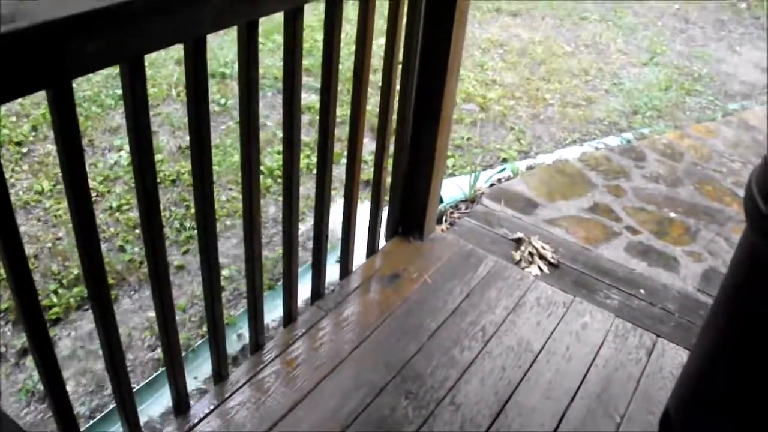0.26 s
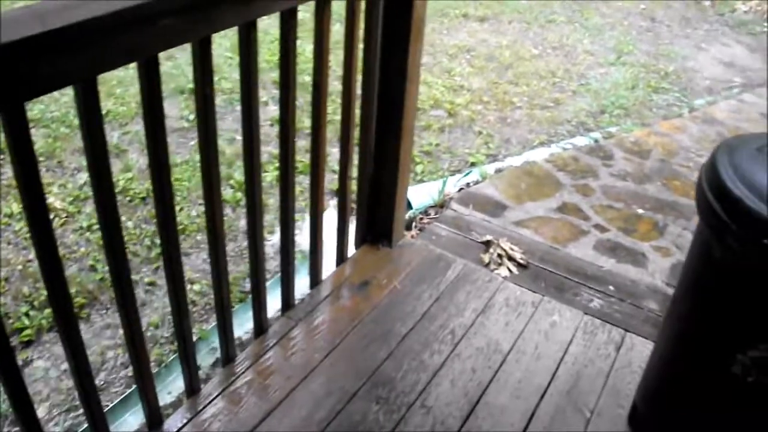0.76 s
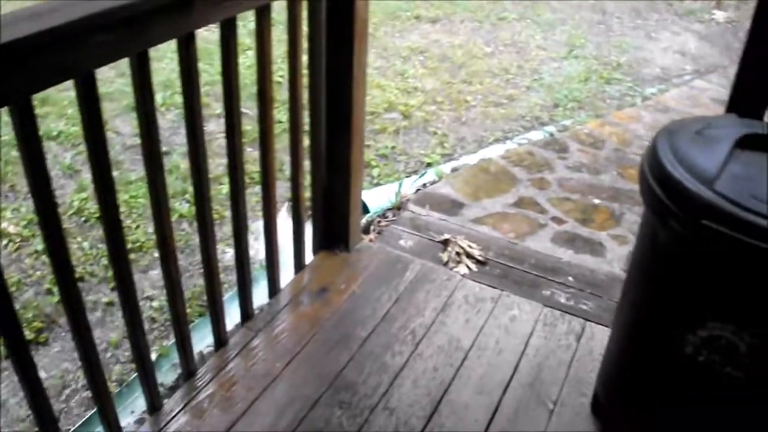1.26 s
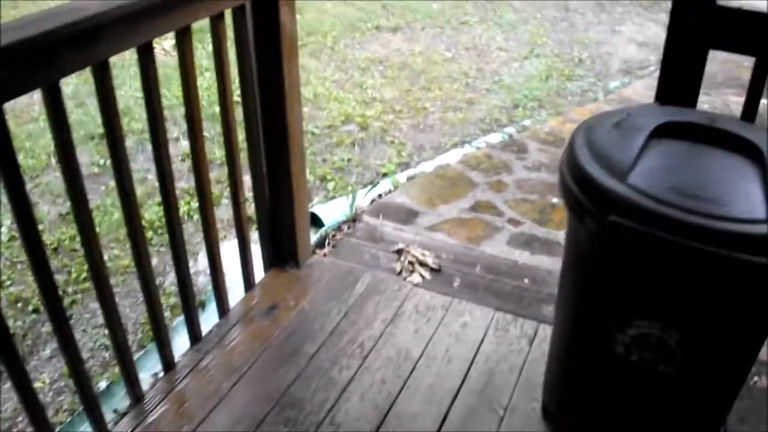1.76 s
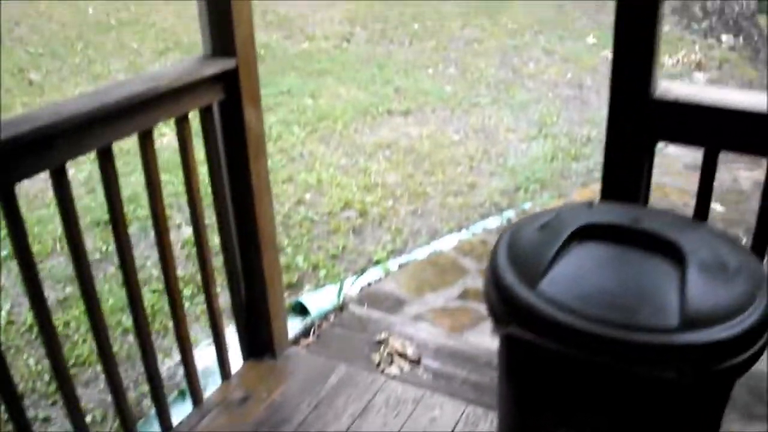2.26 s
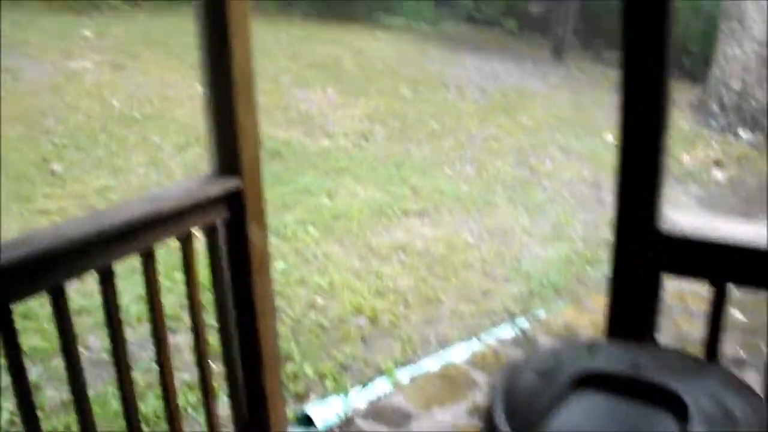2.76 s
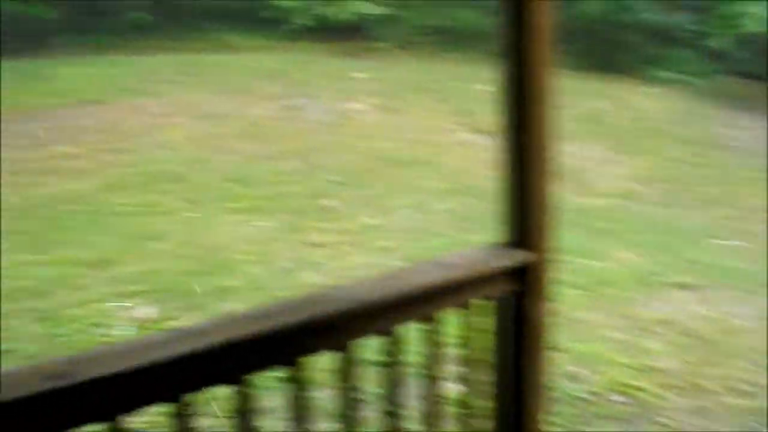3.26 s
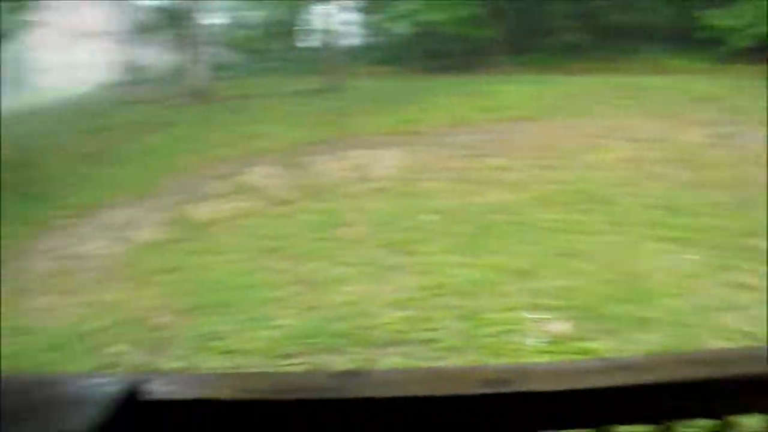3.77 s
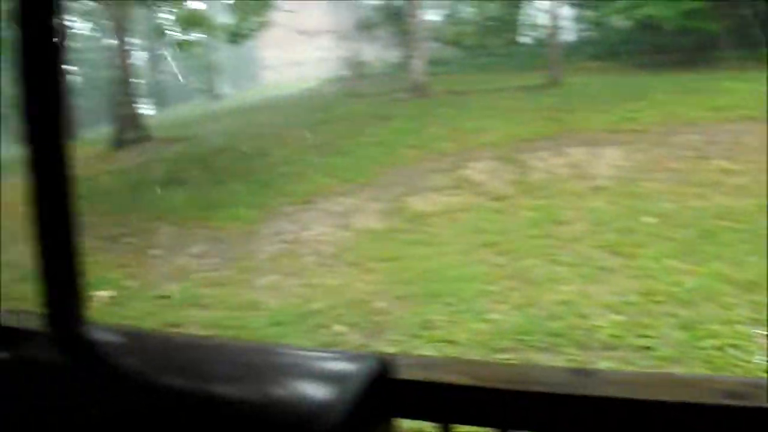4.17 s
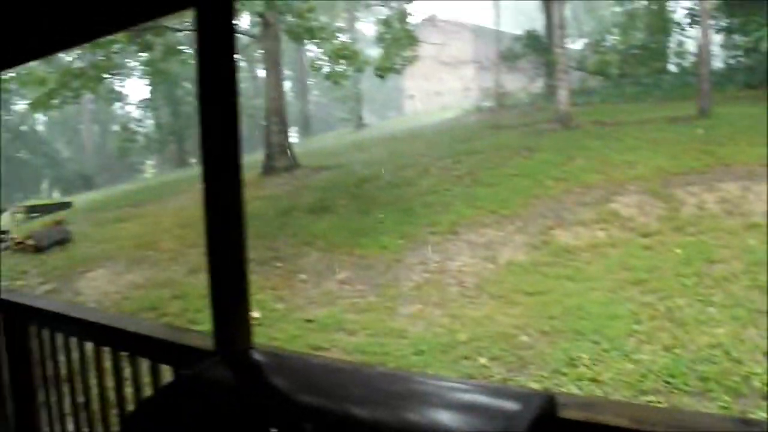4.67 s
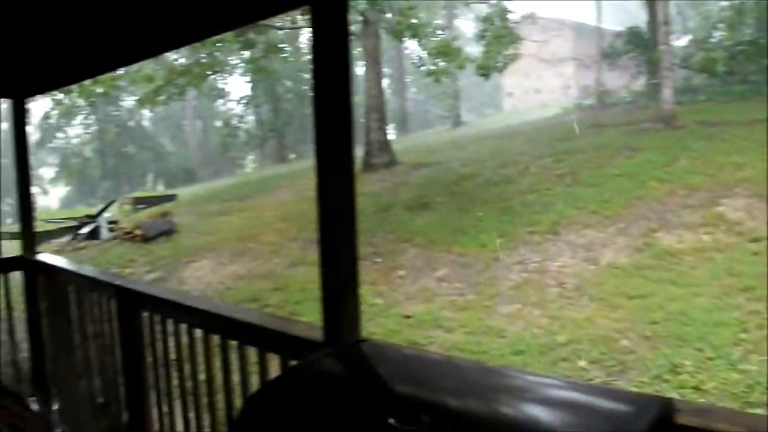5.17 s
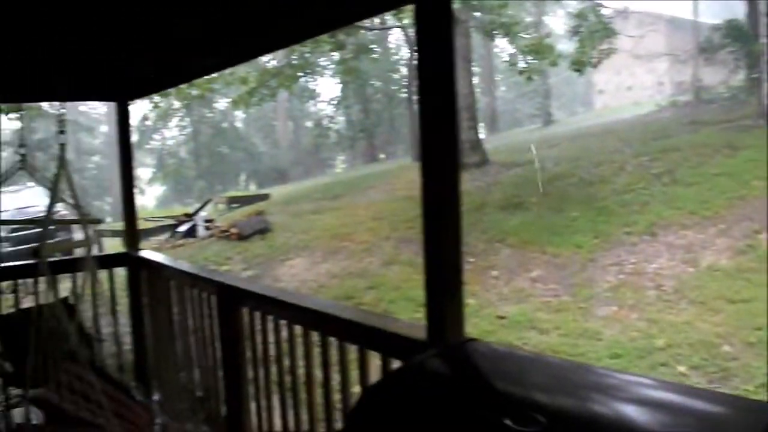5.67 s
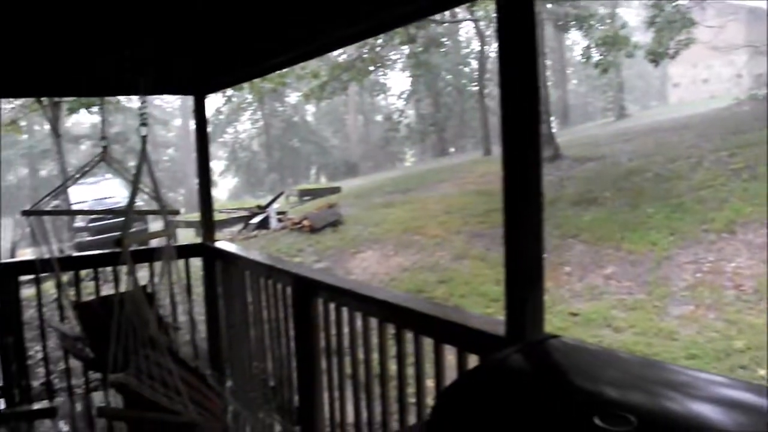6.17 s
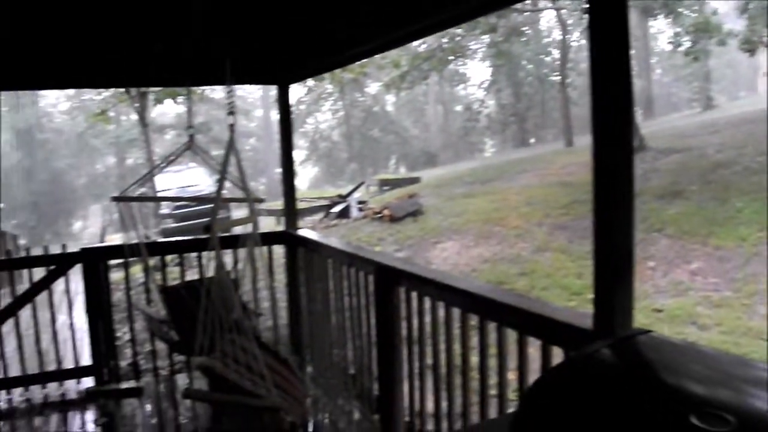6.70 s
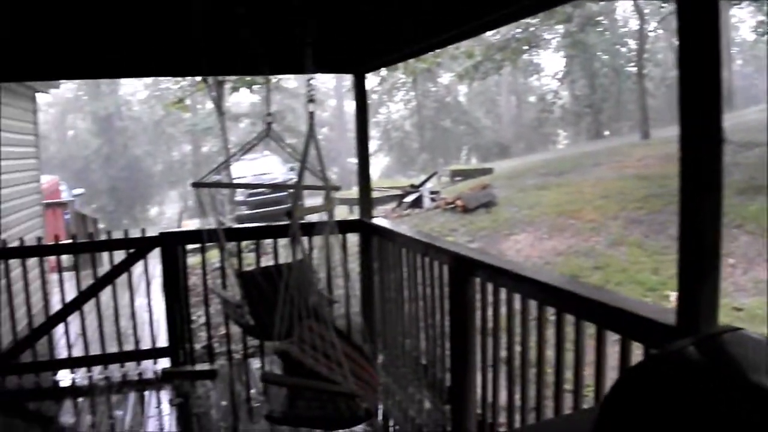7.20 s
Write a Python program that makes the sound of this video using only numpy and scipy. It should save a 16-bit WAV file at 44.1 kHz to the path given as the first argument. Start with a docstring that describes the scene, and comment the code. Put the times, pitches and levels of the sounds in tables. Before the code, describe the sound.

Heavy rain hisses shrilly and steadily around a wooden porch, with close drops splashing and ticking and brief low wind rumbles buffeting the microphone.

```python
"""A shrill, pumping hiss: heavy rain on a lawn and trees, heard from a roofed wooden porch.
Countless far drops merge into a noise wash, and nearer drops are random clicks that patter.
Close splashes are clicks with a puff of noise, sharp ticks are bare clicks, and wind is a low rumble.
The microphone's port rings near 3 kHz, which makes the rain shrill.
Loud splashes make a limiter turn everything down briefly, so the hiss pumps."""
import sys
import numpy as np
from scipy import signal
from scipy.fft import rfft, irfft, next_fast_len
from scipy.io import wavfile
from scipy.ndimage import uniform_filter1d, minimum_filter1d

SR = 44100
rng = np.random.default_rng(int(sys.argv[2]) if len(sys.argv) > 2 else 0)


def inscribe(sig):
    """Save sig as 16-bit PCM at rate SR to the path in sys.argv[1].

    A 1-D sig is mono; a 2-D sig holds one channel per row.
    Samples are clipped to [-1, 1] before scaling.
    """
    pcm = np.round(np.clip(np.atleast_2d(sig).T, -1, 1) * 32767)
    wavfile.write(sys.argv[1], SR, pcm.astype(np.int16))


N = 328104  # length in samples, about 7.4 s


def from_db(db):
    """Turn decibels into a plain multiplier."""
    return 10 ** (np.asarray(db) / 20)


def rms_one(x):
    """Scale a sound to an average power of one."""
    return x / np.sqrt(np.mean(x ** 2) + 1e-20)


def level_over_time(points):
    """Join (time, level) points with straight lines."""
    times, levels = np.transpose(points)
    return np.interp(np.arange(N) / SR, times, levels)


def at_hz(points, hz):
    """Read a curve at any frequency, with pitch spaced as the ear hears it (log scale)."""
    point_hz, values = np.transpose(points)
    return np.interp(np.log(hz), np.log(point_hz), values)


def butter(x, hz, kind, order=2):
    """Keep the lows, the highs or a band, with a smooth Butterworth filter."""
    safe_hz = np.clip(hz, 10, .45 * SR)
    sections = signal.butter(order, safe_hz, kind, fs=SR, output="sos")
    return signal.sosfilt(sections, x + 1e-18)


def drift(rate_hz):
    """Wander slowly at random around zero, with a typical size of one."""
    step = 40  # compute one point every 40 samples, then join the points
    r = np.exp(-2 * np.pi * rate_hz * step / SR)
    noise = rng.standard_normal(N // step + 2002)
    slow = signal.lfilter([1], [1, -2 * r, r * r], noise)[2000:]  # skip the filter's start-up
    return np.interp(np.arange(N) / step, np.arange(len(slow)), rms_one(slow))


def clicks(rows):
    """Place a one-sample click of the given level at each given time."""
    times, levels_db = np.transpose(rows)
    out = np.zeros(N)
    out[np.round(times * SR).astype(int)] = from_db(levels_db)
    return out


def swells(rows, attack_s, release_s):
    """Ramp each swell up and down; short ones stay below full height, overlapping ones add in dB."""
    t = np.arange(N) / SR
    total_db = 0
    for start, length, db in rows:
        rise = (t - start) / attack_s
        fall = (start + length - t) / release_s
        total_db = total_db + db * np.clip(.5 + np.minimum(rise, fall), 0, 1)
    return total_db


# Light air on the microphone, strongest midway: (time [s], level [dB])
BREEZE_LEVEL = [(0, -45), (2.6, -43.5), (3.4, -36.5), (4.2, -39), (5.5, -40.5), (7.44, -38.5)]
# Gusts that buffet the microphone, timed between the half-way points of rise and fall:
# (time [s], length [s], full swell [dB])
WIND_GUSTS = [(2.83, 0.086, 7), (3.23, 0.045, 9), (3.34, 0.083, 4), (3.83, 0.16, 13.5), (4.02, 0.11, 13),
              (4.27, 0.053, 8), (4.46, 0.19, 10), (4.72, 0.28, 6.5), (6.22, 0.071, 17.5), (7.38, .1, 19)]


def wind(top_hz, even_s):
    """Air eddies press on both channels alike as a low rumble; breeze and gusts set its strength."""
    level_db = level_over_time(BREEZE_LEVEL) + swells(WIND_GUSTS, attack_s=0.11, release_s=0.05)
    eddies = butter(rng.standard_normal(N), top_hz, "low", order=3)
    eddies = butter(eddies, 15, "low", order=1)  # slower eddies push harder
    eddies = butter(eddies, 14, "high")
    # Even out the rumble's own ups and downs, so the level curve decides.
    power = uniform_filter1d(eddies ** 2, int(even_s * SR) + 1)
    return from_db(level_db) * eddies / np.sqrt(power + 1e-12)


# Sharp bright ticks, levels before filter and mix: (time [s], level [dB])
SHARP_TICKS = [(.205, -6), (.858, -4), (1.792, 2), (5.6392, 6), (7.187, 1)]


def ticks():
    """Each tick is a short, hard click with only its highs kept."""
    return butter(clicks(SHARP_TICKS), 2600, "high")


# Big drops splashing close by, levels before filters and mix: (time [s], level [dB])
CLOSE_SPLASHES = [(0.452, 1.2), (0.617, 2.7), (0.76, 2.5), (0.953, 3), (1.042, 3), (1.185, 1.4),
                  (1.313, 2.5), (1.439, 1.5), (1.814, 0.5), (1.96, 0.8), (2.045, 1.5), (2.315, 1.5),
                  (2.407, 1), (2.495, 1.9), (2.583, 2.6), (2.653, 8), (2.925, 3), (3.003, 2.5), (3.187, 3),
                  (3.288, -4), (3.61, 2.5), (3.793, 1.4), (3.931, -6), (4.112, 3.5), (4.191, 3),
                  (4.338, 3.8), (4.407, 1.2), (4.57, 4.5), (4.733, 2.5), (4.885, 2), (5.198, 4.5),
                  (5.316, 1.2), (5.388, 0.4), (5.569, 5), (5.64, 3.5), (5.715, 4.5), (5.788, 5),
                  (5.941, 1.5), (6.027, -2), (6.082, 2), (6.168, 3.5), (6.252, 4), (6.665, 4.5),
                  (6.825, 2.8), (7.256, 5.5), (7.362, 1.9)]


def splashes(spray_s, spray_db, top_hz):
    """A big drop slaps the porch edge with a click and throws a brief, fading spray of noise."""
    t = np.arange(SR // 40) / SR
    hits = clicks(CLOSE_SPLASHES)
    spray_strength = signal.fftconvolve(hits, np.exp(-t / spray_s))[:N]
    spray = spray_strength * rng.standard_normal(N)
    bright = butter(hits + from_db(spray_db) * spray, 2010, "high")
    return butter(bright, top_hz, "low", order=3)


def patter(per_s, size_spread_db, low_hz, top_hz):
    """Nearer drops tick at random from left, front and right, many small and a few large."""
    out = np.zeros((2, N))
    for lag in (-1, 0, 0, 1):  # samples by which the left channel hears the drop later
        sizes = from_db(size_spread_db * np.minimum(rng.exponential(1, N), 4))
        sizes = sizes * rng.choice([-1, 1], N)  # push or pull
        drops = sizes * (rng.random(N) < per_s / 4 / SR)
        out += [np.roll(drops, lag), drops]
    bright = butter(out, low_hz, "high", order=1)
    return rms_one(butter(bright, top_hz, "low", order=6))


# Tone colour of rain in the open air: (frequency [Hz], relative level [dB per Hz])
RAIN_COLOUR = [(40, -10), (80, -2.5), (140, -3), (250, -3), (400, -4.5), (700, -2), (1200, -4), (2000, -3),
               (3200, 0), (4600, 3), (5700, 0), (7200, 4.5), (10300, -2.5), (12000, -25), (15000, -3)]
# Likeness of the two channels in the wash: (frequency [Hz], correlation [1 = same])
CHANNEL_LIKENESS = [(300, 1), (700, 1), (1400, 1), (3100, 1), (5000, 0.97), (7000, 1), (10000, 0.88),
                    (13000, .3)]
# Low wash of the lawn, a little fuller once the microphone faces it: (time [s], level [dB])
LAWN_LEVEL = [(0, -20), (2.9, -20), (4, -19.5), (7.44, -19.5)]


def wash(splash_db, spray_db, patchy_db, splash_hz, spray_hz):
    """Far drops merge into noise: soft ground gives the lows, puddles the middle, fine spray the top."""
    lawn_db = level_over_time(LAWN_LEVEL)
    edges = np.geomspace(40, 16000, 23)
    white = rng.standard_normal((2, 2, N))
    out = 0
    for k, (low, high) in enumerate(zip(edges, edges[1:])):
        mid, side = butter(white[k % 2], [low, high], "band")  # neighbouring bands use other noise
        hz = np.sqrt(low * high)
        # Blend from lawn to puddles to spray as the frequency rises.
        above_splash = 1 / (1 + (splash_hz / hz) ** 8)
        above_spray = 1 / (1 + (spray_hz / hz) ** 8)
        layer_db = (1 - above_splash) * lawn_db
        layer_db = layer_db + (above_splash - above_spray) * splash_db + above_spray * spray_db
        gain = from_db(at_hz(RAIN_COLOUR, hz) + layer_db + patchy_db * drift(26.6))
        # The shared part goes to both channels, the other part with opposite signs.
        alike = np.clip(at_hz(CHANNEL_LIKENESS, hz), -1, 1)
        stereo = np.sqrt(1 + alike) * mid + np.sqrt(1 - alike) * side * [[1], [-1]]
        out = out + gain * stereo
    return out


def scene():
    """Steady rain flutters slightly; close splashes, sharp ticks and wind lie on top."""
    flutter = from_db(0.21 * drift(13) + 0.56 * drift(30))
    puddles_db = -22 + 0.23 * drift(30)
    far = wash(puddles_db, spray_db=-22, patchy_db=1.38, splash_hz=2400, spray_hz=4200)
    near = from_db(-23) * patter(per_s=2000, size_spread_db=1.5, low_hz=1790, top_hz=10930)
    close = from_db(8.5) * splashes(spray_s=0.002, spray_db=-27, top_hz=5080)
    sharp = from_db(7.5) * ticks()
    return flutter * (far + near) + close + sharp + wind(top_hz=68, even_s=0.114)


def port_resonance(x, ring_hz, width_hz):
    """The air in the microphone port rings at its own pitch and boosts sound near it."""
    r = np.exp(-np.pi * width_hz / SR)
    w = 2 * np.pi * ring_hz / SR
    poles = [1, -2 * r * np.cos(w), r * r]
    return signal.lfilter([sum(poles)], poles, x)


def limiter(x, limit_db, hold_s, recovery_db_per_s, look_ahead_s):
    """Peaks over the limit turn the gain down just in time; it holds, then creeps back steadily."""
    peak_db = 20 * np.log10(np.abs(x).max(axis=0) + 1e-9)
    over_db = np.maximum(peak_db - limit_db, 0)
    hold, ahead = int(hold_s * SR) + 1, int(look_ahead_s * SR) + 1
    held_db = -minimum_filter1d(-over_db, hold, origin=(hold - 1) // 2)
    recovery = recovery_db_per_s * np.arange(N) / SR
    cut_db = np.maximum.accumulate(held_db + recovery) - recovery
    # Start each cut a little early and smooth its edge.
    gain_db = uniform_filter1d(minimum_filter1d(-cut_db, ahead), ahead)
    return x * from_db(gain_db)


def delay(x, lag):
    """Hold each frequency back by its own phase angle."""
    size = next_fast_len(N + 64)
    hz = np.fft.rfftfreq(size, 1 / SR) + 1  # +1 avoids the log of zero
    return irfft(rfft(x, size) * np.exp(-1j * at_hz(lag, hz)), size)[:N]


# How far the left channel trails, most in the treble: (frequency [Hz], phase lag [radians])
LEFT_TRAIL = [(20, 0.021), (1600, 0.0028), (2300, 0.38), (3300, 0.38), (5300, 0.7), (9000, 1.32),
              (15000, 2)]


def record(dry):
    """The microphone port rings, the limiter ducks loud peaks, the left side trails, the top is cut."""
    ringing = port_resonance(dry, ring_hz=3230, width_hz=414)
    left, right = limiter(ringing, limit_db=-0.96, hold_s=0.026, recovery_db_per_s=49, look_ahead_s=0.0042)
    top_cut = signal.ellip(10, .1, 80, 15300, fs=SR, output="sos")  # steep cut above 15300 Hz
    return signal.sosfilt(top_cut, [delay(left, LEFT_TRAIL), right])


dry = scene()
out = record(dry)
inscribe(out)
```